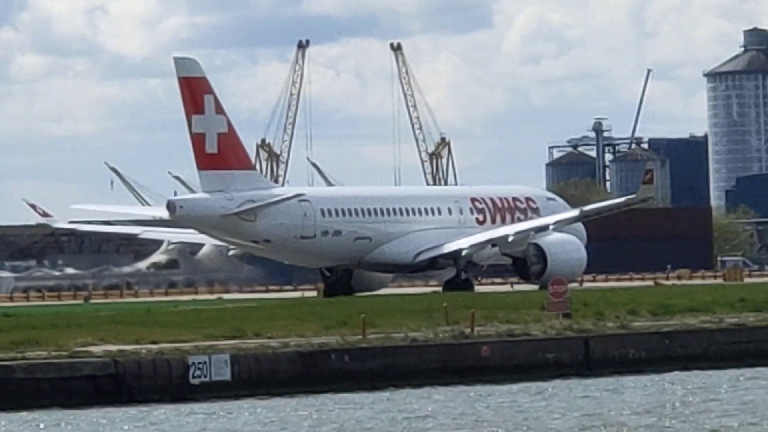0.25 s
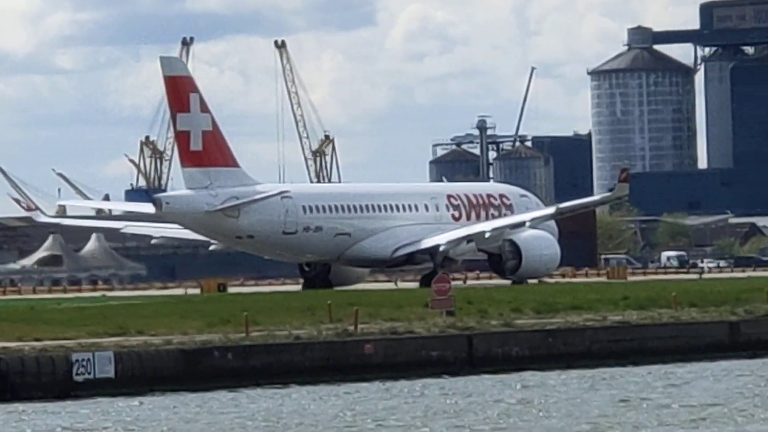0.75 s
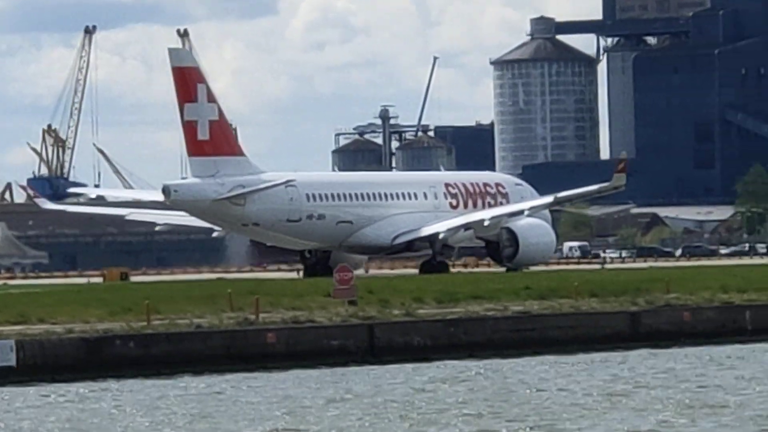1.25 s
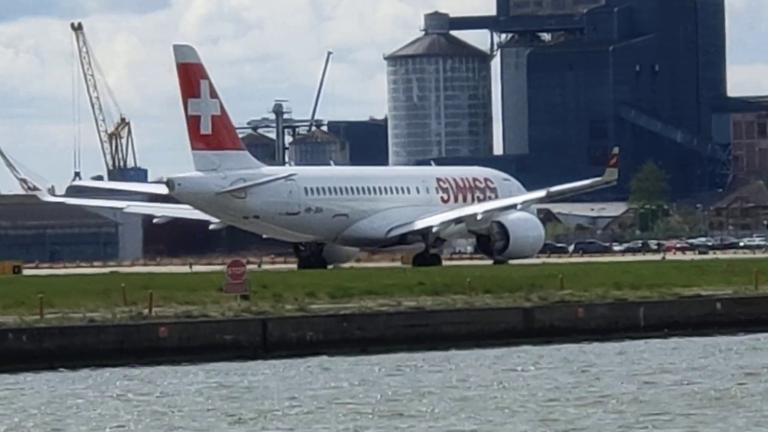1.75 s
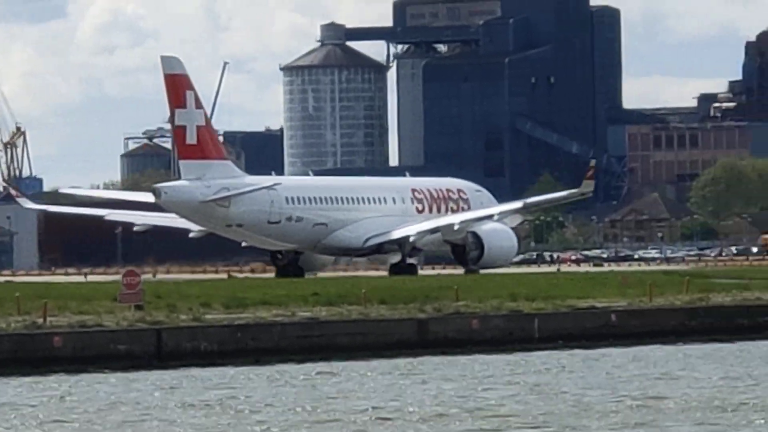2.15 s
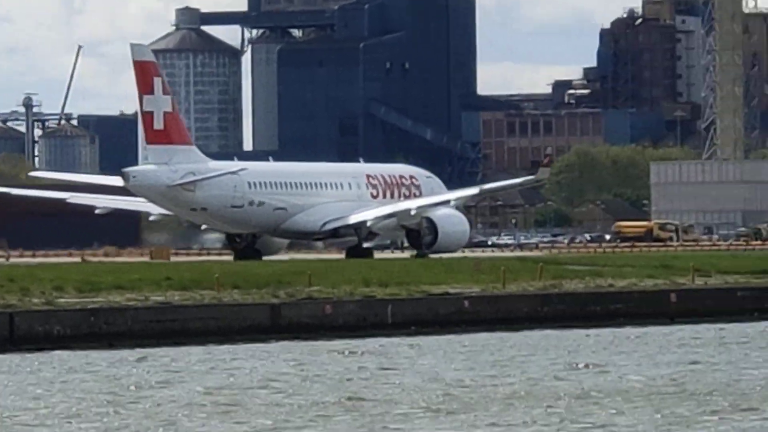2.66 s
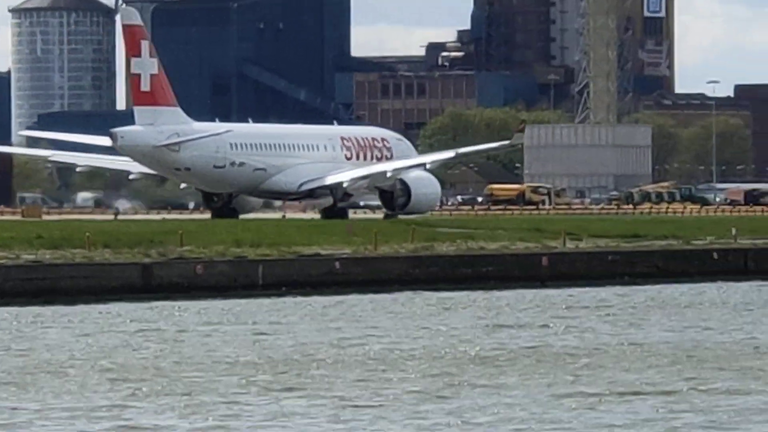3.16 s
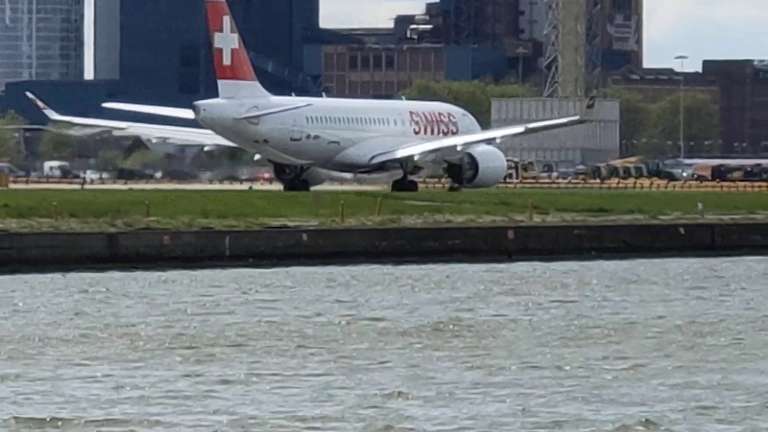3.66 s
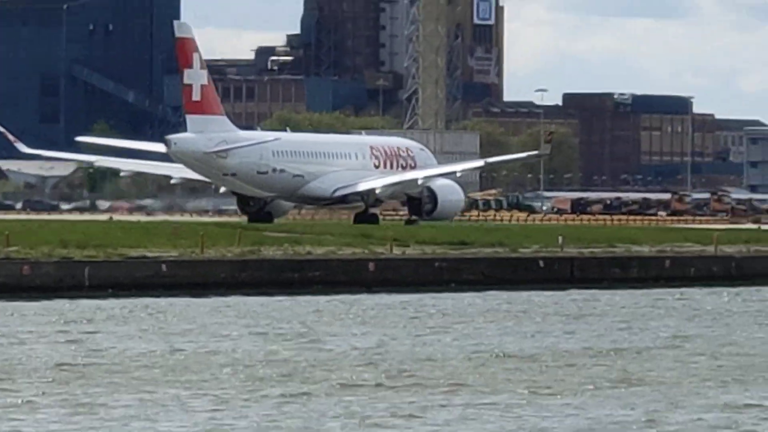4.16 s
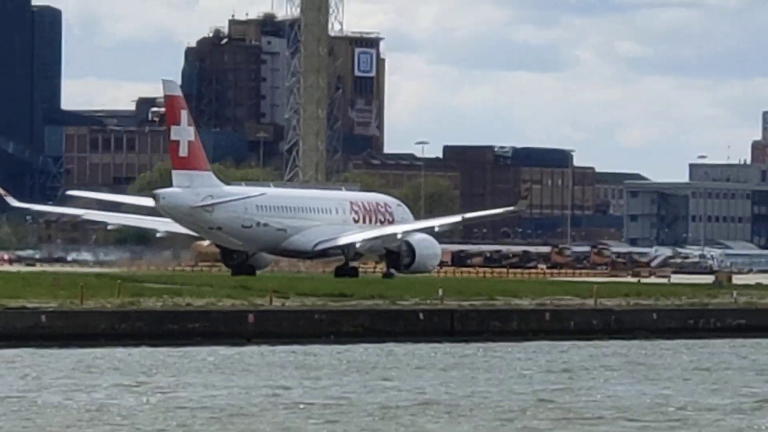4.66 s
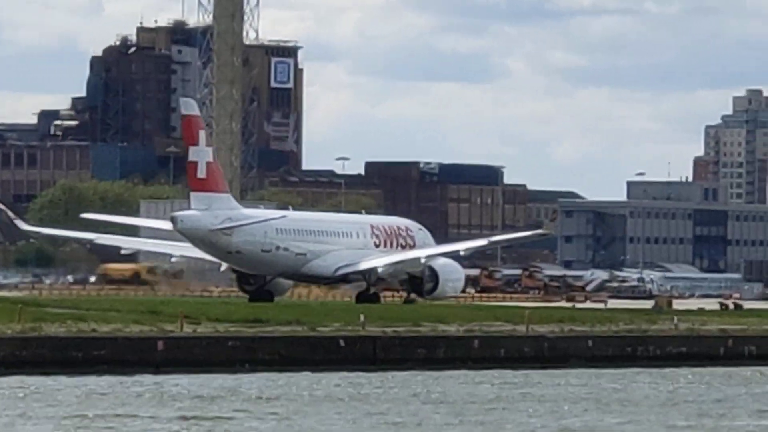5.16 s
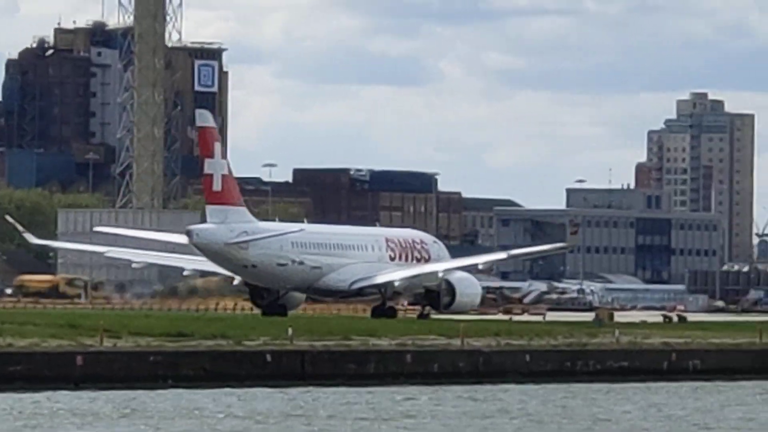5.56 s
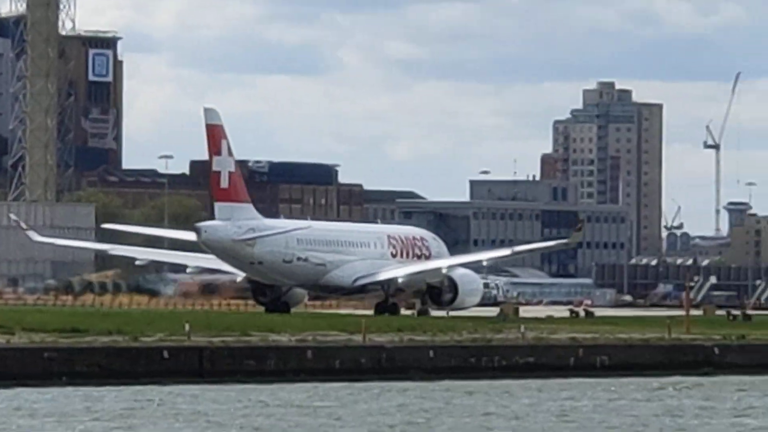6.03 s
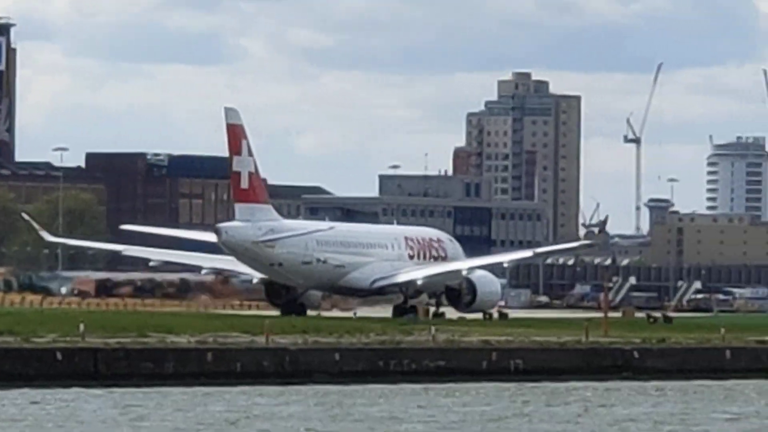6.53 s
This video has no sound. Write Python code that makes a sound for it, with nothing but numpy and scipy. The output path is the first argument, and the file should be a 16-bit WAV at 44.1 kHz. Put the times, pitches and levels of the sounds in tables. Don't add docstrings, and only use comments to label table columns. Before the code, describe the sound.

An airliner taxis away across water, low jet rumble and breathy roar with a wavering whine, while wind thumps the microphone in bursts.

```python
import sys
import numpy as np
from scipy import signal
from scipy.fft import rfft, irfft
from scipy.io import wavfile
from scipy.ndimage import uniform_filter1d

SR = 44100
rng = np.random.default_rng(int(sys.argv[2]) if len(sys.argv) > 2 else 0)


def gain_from_db(level_db):
    decades = np.asarray(level_db, float) / 20
    return 10 ** decades


def unload_wav(signal):
    wavfile.write(
        sys.argv[1],
        SR,
        np.round(np.clip(np.atleast_2d(signal).T, -1, 1) * 32767).astype(np.int16),
    )


N = 299439
TIME = np.arange(N) / SR
FRAME, HOP = 1024, 256

# time in seconds, heading from 0 (side-on) to 1 (tail-on).
HEADING = [
    (0, 0.085),
    (1, 0.055),
    (2.8, 0.11),
    (3.6, 0.66),
    (6.79, 0.78),
]
# time in seconds, level in dB.
RUMBLE_LEVEL = [(0.0, -28.5), (0.4, -27), (0.65, -26), (1.1, -26.5), (1.4, -30), (1.9, -26.5), (2.5, -28),
                (2.85, -27), (3.25, -29.5), (3.55, -33.5), (3.8, -31.5), (4.3, -33.5), (5.0, -32.5),
                (5.25, -23), (5.6, -30.5), (6.0, -31), (6.4, -34), (6.8, -32)]
# frequency in Hz, density in dB per Hz.
RUMBLE_COLOUR = [(12, -53), (20, -23), (43, -24), (65, 0), (135, -4.5), (203, -8.5), (289, -18.5),
                 (336, -17), (380, -24.5), (520, -28), (680, -51), (1140, -120)]
# time in seconds, half-length in seconds, peak in dB.
DEEP_THROBS = [(0.1, 0.12, -35), (0.64, .2, -38), (1.13, 0.38, -31), (1.5, 0.11, -29), (1.66, .05, -29.5),
               (1.95, .3, -33), (2.25, 0.23, -32.5), (2.63, 0.063, -30.5), (2.78, 0.11, -28),
               (2.94, 0.076, -26), (3.2, .2, -30), (3.57, 0.19, -33.5), (4.1, 0.8, -36), (4.9, 0.16, -29.5),
               (5.15, .06, -32), (5.31, .1, -33.5), (5.62, 0.18, -31.5), (5.9, .08, -30), (6.2, 0.33, -33),
               (6.67, 0.03, -24)]
# time and half-length in seconds, centre in Hz,
# lift in dB.
PLUME_POCKETS = [(.12, 0.055, 209, 4), (.85, .15, 267, -2.5), (1.15, .08, 290, 4), (1.6, .25, 60, -4),
                 (2.0, .1, 190, -1), (2.1, 0.11, 269, 3), (2.75, 0.18, 90, 2), (3.55, .06, 150, -4),
                 (3.68, .06, 139.5, 3.5), (5.5, .15, 50, -3), (5.75, .1, 120.3, 2.5), (6.05, .08, 258, 2.5),
                 (6.2, .08, 79.4, -2.5), (6.45, 0.13, 169.6, -4.5)]
ROAR_CENTRES_HZ = [680, 1100, 2000, 3800]
# frequency in Hz, density in dB per Hz.
ROAR_SIDE_ON = [(240, -42), (400, -30), (504, -24), (615, -5), (749, -6), (800, -3), (855, -6),
                (1110, -5.5), (1480, -12), (1950, -7.5), (2380, -12), (3350, -21.5), (3740, -22),
                (4510, -27.5), (5400, -40.5), (5900, -50), (7230, -83), (12200, -120)]
ROAR_TAIL_ON = [(240, -45.5), (400, -2.5), (569, -5.5), (635, -6), (774, -4.5), (846, -5.5), (1110, -7),
                (1430, -13.5), (1550, -12), (1600, -5.5), (1690, 0), (1830, -5), (2040, -15.5), (3240, -24),
                (5560, -38.5), (7230, -62), (12200, -120)]
# frequency in Hz, width in Hz, lift in dB.
ECHO_RIPPLE = [
    (2510, 120, 7.5),
    (3900, 80, 2.5),
    (2940, 67, -2.5),
    (3220, 140, 6.5),
]
# level side-on in dB, level tail-on in dB, share of the air's swelling it follows.
ROAR_PARTS = [
    (-42.5, -43, 0.86),
    (-42, -43, 1),
    (-41, -46.5, 0.89),
    (-43, -53, 0.46),
]
# time in seconds, level in dB.
AIR_CARRY = [(0.0, 1.5), (0.4, -0.5), (0.7, 1.5), (1.05, 5.5), (1.35, 6), (1.65, 2), (2.0, 5), (2.3, 8.5),
             (2.55, 3.5), (2.95, 2.5), (3.3, 3), (3.6, 0), (4.45, -2), (4.9, 3), (5.1, 1.5), (5.8, 2.5),
             (6.4, -0.5), (6.79, -1)]
# time and half-length in seconds, centre in
# Hz, lift in dB.
ROAR_POCKETS = [(1.1, 0.044, 2000, 2.5), (1.1, 0.13, 5200, 3), (2.9, 0.47, 5400, -3), (5.3, 0.79, 4800, 1.5),
                (6.3, 0.28, 5630, -1.5), (1.15, 0.27, 1090, 3), (1.3, .12, 700, 0.5),
                (1.71, 0.26, 1114, 7.5), (2.1, 0.11, 1100, 3), (2.268, 0.35, 706, 6),
                (2.406, 0.23, 2060, 3.5), (2.198, 0.087, 1980, 0.5), (2.42, 0.091, 3800, 2),
                (3.05, 0.13, 646, -3.5), (2.9, .12, 477, 2), (4.35, .15, 400, 5), (2.7, 0.18, 1106, 8),
                (2.75, 0.12, 536, 3.5), (3.365, 0.4, 693, 6), (4.44, 0.25, 2000, 3.5),
                (4.934, 0.063, 700, 5), (4.85, 0.22, 3720, 3), (5.18, 0.049, 700, 9), (5.26, .1, 2000, -1),
                (5.655, 0.44, 1960, 4), (5.96, 0.32, 1100, 3)]
# frequency in Hz, likeness from 0 to 1.
LIKENESS_SIDE_ON = [(40, .8), (80, 0.99), (300, 0.97), (470, 0.71), (700, 0.95), (1200, 0.87), (1500, 0.13),
                    (1900, 0.91), (2580, 0.51), (3630, .75), (5110, 0.5)]
LIKENESS_TAIL_ON = [(40, .8), (80, 1), (200, 0.95), (450, .75), (700, 0.7), (1100, 0.54), (1500, 0.2),
                    (1900, 0.4), (2500, 0.077), (3500, 0.37), (5100, 0.26)]
# frequency in Hz, likeness from 0 to 1.
BASS_LIKENESS = [(40, .84), (90, .9), (150, 1)]
# frequency in Hz, difference in dB.
BALANCE_SIDE_ON = [(60, -1), (84, -0.5), (120, -2), (170, 0.5), (240, -1), (330, -2), (470, 2.5), (660, 1),
                   (920, 1), (1300, -4), (1830, 1), (2580, -9), (3630, -1), (5110, -5)]
BALANCE_TAIL_ON = [(60, -1.5), (84, -0.5), (120, 0.5), (170, -0.5), (240, 0.5), (330, -1), (470, -1),
                   (660, 1.5), (920, -1), (1300, -0.5), (1830, -3.5), (2580, 2), (3630, -2.5), (5110, -14)]
# frequency in Hz, lead in radians.
LEFT_LEAD = [(0, 0), (1210, -0.2), (1460, 1.6), (1720, -0.3), (2070, -0.2), (2330, 1.8), (2580, 5.2),
             (2930, 6.7), (3270, 6.8), (3530, 6.4), (3880, 6.6), (4130, 6.4), (4910, 7.4), (5250, 6.8)]
# time in seconds, blade tone in Hz.
FAN_PITCH = [(0, 799), (1.5, 799), (2.3, 796), (2.7, 798), (3.0, 803), (3.35, 814), (3.7, 819), (4.1, 824),
             (4.5, 826), (5.1, 825), (5.45, 819), (5.8, 816.5), (6.2, 814), (6.79, 813)]
# order, trim in dB, left-right in dB, left lead in radians, dock echo in dB.
FAN_ORDERS = [
    (1, -4, -1, 0.19, -50.5),
    (2, -4, 11, 0.45, -49),
    (4, -12.5, -7.5, 0.41, -62.5),
]
# width in Hz, amount of beating left in.
FAN_BLUR = [
    (8, .18),
    (8, .12),
    (90, 2.),
]
# time and half-length in seconds, peak in dB.
BLADE_FLARES = [(0.04, 0.025, -43), (0.54, .07, -37), (0.69, 0.055, -39), (1.05, .2, -50.5),
                (1.32, 0.11, -34.5), (1.74, 0.083, -31.5), (1.91, .05, -33), (2.1, 0.081, -30),
                (2.23, 0.044, -21), (2.44, 0.048, -30), (2.82, .05, -36), (2.96, .07, -35),
                (3.39, 0.074, -30.5), (3.88, 0.06, -40.5), (4.3, 0.054, -47), (4.83, 0.17, -41),
                (5.1, 0.17, -41), (5.34, .05, -32.5), (5.84, 0.031, -32.5), (5.92, 0.019, -28.5),
                (5.99, 0.054, -32), (6.15, 0.072, -45), (6.75, 0.047, -41)]
# time and half-length in seconds, peak in dB.
OCTAVE_FLARES = [(0.0, .05, -48), (0.68, 0.077, -50), (0.96, 0.097, -44), (1.3, 0.18, -56),
                 (1.74, .07, -43.5), (1.98, .06, -40), (2.25, 0.063, -39), (2.38, .05, -45),
                 (2.52, 0.051, -46), (2.96, 0.041, -46), (3.15, 0.2, -44.5), (3.38, 0.069, -37.5),
                 (3.66, 0.075, -46.5), (3.95, 0.14, -42.5), (4.25, 0.041, -44), (4.6, 0.27, -47.5),
                 (4.86, 0.14, -40.5), (5.43, 0.12, -39.5), (5.66, 0.055, -37.5), (5.84, 0.077, -41),
                 (5.98, 0.082, -39.5), (6.22, .08, -44), (6.6, 0.31, -54)]
# time in seconds, half-length in seconds, peak in dB.
LEFT_GUSTS = [(0.09, 0.041, -23), (0.42, 0.06, -37), (0.6, 0.046, -33), (0.98, 0.056, -37),
              (1.33, 0.032, -23), (1.47, 0.089, -26.5), (1.68, 0.066, -28), (2.03, 0.054, -31),
              (2.3, 0.045, -48), (2.62, 0.078, -34.5), (2.93, 0.045, -39), (4.52, 0.053, -35.5),
              (4.68, 0.075, -29.5), (4.91, 0.045, -23.5), (5.06, 0.1, -23.5), (5.135, 0.032, -20.5),
              (5.2, 0.064, -18), (5.27, 0.036, -21), (5.33, 0.044, -17), (5.385, 0.038, -13.5),
              (5.44, 0.021, -21), (5.56, .04, -34), (5.8, 0.062, -29), (5.95, 0.094, -25),
              (6.17, 0.085, -30), (6.33, 0.15, -32.5), (6.62, 0.043, -35)]
RIGHT_GUSTS = [(0.1, 0.04, -40), (0.403, 0.07, -39), (0.61, 0.044, -32), (0.8, 0.039, -27),
               (0.99, 0.041, -29), (1.127, 0.045, -36), (1.47, 0.057, -26), (1.63, 0.064, -28.5),
               (2.31, 0.048, -29), (2.592, 0.05, -32), (2.72, .06, -41), (2.94, 0.033, -36),
               (3.152, 0.067, -35), (4.533, 0.076, -34), (4.781, 0.077, -24), (4.924, 0.063, -16.5),
               (5.038, 0.045, -29.5), (5.172, 0.073, -28), (5.27, 0.072, -31), (5.498, 0.1, -23.5),
               (5.825, 0.05, -34.5), (5.908, 0.041, -26), (6.1, 0.11, -39), (6.296, 0.064, -34),
               (6.55, 0.13, -42)]
# time in seconds, peak in dB.
THUMPS = [
    [(0.041, -25), (1.306, -25), (4.924, -24), (5.133, -10), (5.147, -12), (5.182, -11), (5.192, -10),
     (5.216, -11), (5.225, -22), (5.264, -12), (5.302, -20), (5.318, -26), (5.343, -14), (5.352, -12),
     (5.366, -15), (5.379, -18), (5.387, -14), (5.395, -16), (5.439, -26), (5.924, -9), (6.164, -23)],
    [(0.8, -23), (0.975, -19), (1.447, -22), (1.628, -18), (2.299, -37), (2.578, -32), (4.733, -14.5),
     (4.777, -15), (4.793, -15), (4.864, -14), (4.876, -19), (4.905, -21), (4.919, -21), (4.929, -13),
     (4.942, -7), (4.952, -14), (5.011, -17), (5.067, -10), (5.114, -7), (5.169, -10), (5.184, -19),
     (5.485, -8), (5.518, -12.5), (5.885, -30)],
]
THUMP_MS = [0.42, 0.34]
PORT_SHARPNESS = [.2, .55]
PORT_SIGN = [-1, 1]
PORT_REBOUND = [.35, .15]
# time in seconds, peak in dB.
MOTOR_TICKS = [(0.0318, -58), (0.4668, -67), (0.5172, -66), (0.598, -65), (0.6779, -64), (0.8375, -64),
               (1.0395, -61), (1.1573, -64), (1.2376, -68), (1.3159, -62.5), (1.3877, -65.5), (1.708, -68),
               (1.7973, -71.5), (1.8776, -67), (1.957, -68), (2.0273, -68), (2.1171, -66), (2.3565, -67),
               (2.588, -63.5), (2.7716, -66), (2.828, -66), (2.9178, -64), (2.9981, -62), (3.0774, -63),
               (3.2375, -66), (3.3179, -63), (3.3937, -66), (3.4531, -67), (3.5578, -67), (3.6376, -67),
               (3.7179, -70), (3.7878, -61), (3.8781, -66), (3.9449, -66), (4.0352, -60), (4.0946, -66),
               (4.2777, -59), (4.357, -66), (4.596, -64), (4.6773, -63), (4.7476, -65), (4.8379, -66),
               (4.9177, -67), (4.9975, -69), (5.0699, -65), (5.238, -63), (5.3173, -68), (5.384, -66),
               (5.4779, -64.5), (5.5568, -69), (5.6371, -67), (5.7079, -61), (5.9574, -64), (6.1968, -66),
               (6.2771, -65), (6.348, -65), (6.4368, -66), (6.5176, -62), (6.5974, -64), (6.6677, -65)]
# frequency in Hz, density in dB per Hz.
HISS_COLOUR = [(5000, -19), (6100, 4), (6500, 2.5), (9000, 0), (11000, -2.5), (13000, -0.5), (14150, -3.5),
               (14400, -64.5)]
# frequency in Hz, threshold in dB.
GATE_OVER = [(4700, -12), (5400, -5.5), (5800, -5), (6050, 1.5), (6350, .3), (6650, .8), (7000, 1),
             (9000, 1), (10000, 1.2), (12600, .8), (13450, 1.3), (13700, 4.5), (14300, 5)]
# frequency in Hz, rise in dB per dB.
GATE_MASKING = [(7000, 0), (12500, .02), (13400, .2), (13700, .6), (14300, .6)]
# frequency in Hz, rise in dB.
GATE_SIDE_ON = [(4700, 6), (5100, 7), (5400, 7.5), (5700, 4), (6050, 1.5), (6350, 0), (6650, 2), (7000, 0)]


def rumble():
    def shape_db(hz, t):
        deep_share = 1 / (1 + (hz / 125) ** 6)
        level_db = follow(RUMBLE_LEVEL, t)[0]
        deep_db = surges(DEEP_THROBS, -36, t) + 2.5
        swell = np.outer(deep_share, deep_db) + np.outer(1 - deep_share, level_db)
        return read(RUMBLE_COLOUR, hz)[:, None] + swell + focus(PLUME_POCKETS, hz, t)
    return gain_from_db(-27.0) * evened(port_noise(shape_db, patchy_db=-1.1))


def roar():
    def shape_db(hz, t):
        heading, carry_db = follow(HEADING, t)[0], follow(AIR_CARRY, t)[0]
        ripple = sum(db * np.exp(-.5 * ((hz - f) / width) ** 2) for f, width, db in ECHO_RIPPLE)
        colour = blend(ROAR_SIDE_ON, ROAR_TAIL_ON, hz, t) + np.outer(ripple, heading)
        shape = colour + focus(ROAR_POCKETS, hz, t)
        for one_part, (side_db, tail_db, carry_share) in zip(np.eye(4), ROAR_PARTS):
            share = read(list(zip(ROAR_CENTRES_HZ, one_part)), hz)
            power = (share[:, None] * gain_from_db(2 * colour)).sum(0)
            level_db = side_db + (tail_db - side_db) * heading + carry_share * carry_db
            shape = shape + np.outer(share, level_db - 10 * np.log10(power))
        return shape
    return gain_from_db(3.0) * port_noise(shape_db, patchy_db=0.87)


def whine():
    hz = follow(FAN_PITCH, TIME)[0]
    blade_db = surges(BLADE_FLARES, -46, TIME)
    octave_db = surges(OCTAVE_FLARES, -54, TIME)
    slow_db = uniform_filter1d(octave_db, size=SR // 2)
    levels = [blade_db, octave_db, slow_db]
    out = np.zeros((2, N))
    for (order, trim_db, pan_db, lead, echo_db), (width, beating), db in zip(FAN_ORDERS, FAN_BLUR, levels):
        tone = np.exp(2j * np.pi * np.cumsum(round(order) * hz) / SR)
        drift = rng.standard_normal((2, N)) + 1j * rng.standard_normal((2, N))
        drift = signal.sosfilt(signal.butter(2, width / 2, fs=SR, output="sos"), drift)
        drift /= np.sqrt(np.mean(abs(drift) ** 2))
        direct = tone * drift[0] / (beating + abs(drift[0]))
        echo = tone * drift[1] * np.roll(drift[1], SR)
        pair = evened(np.array([direct, direct * np.exp(-1j * lead)]).real)
        out += pair * gain_from_db(np.array([[pan_db], [-pan_db]]) / 2) * gain_from_db(db + trim_db)
        out += gain_from_db(echo_db) * evened(echo.real) * np.array([[1], [-1]])
    return out


def wind():
    eddies_per_s, spread_db, lumpy_db = 520, 2.2, 1.2
    limit = .5
    cut = signal.butter(2, 110, "highpass", fs=SR, output="sos")
    out = np.zeros((2, N))
    for k, gusts in enumerate((LEFT_GUSTS, RIGHT_GUSTS)):
        level_db = surges(gusts, -62, TIME)
        lumps = uniform_filter1d(rng.standard_normal(N), size=700)
        lumps = evened(uniform_filter1d(lumps, size=700))
        strike = rng.random(N) < eddies_per_s / SR
        size = gain_from_db(spread_db * np.minimum(rng.exponential(1, N), 3)) * strike
        size = size * np.where(rng.random(N) < PORT_REBOUND[k], -1, 1)
        kind = rng.integers(0, 3, N)
        sharp = PORT_SHARPNESS[k] * gain_from_db(.4 * (level_db + 22))
        widths = [(.3, sharp), (.6, gain_from_db(.3 * (level_db + 20))), (1.15, .7)]  # (ms, share)
        eddies = np.zeros(N)
        for j, (ms, share) in enumerate(widths):
            eddies += share * signal.oaconvolve(size * (kind == j), dip(ms), "same")
        eddies = signal.sosfiltfilt(cut, eddies)
        power = uniform_filter1d(eddies ** 2, size=SR // 10)
        gusting = eddies / np.sqrt(power + 1e-9) * gain_from_db(level_db + lumpy_db * lumps - 0.5)
        s, db = np.transpose(THUMPS[k])
        thumps = np.bincount(np.round((s + .002) * SR).astype(int), gain_from_db(db + 4), N)
        thumps = signal.sosfiltfilt(cut, signal.oaconvolve(thumps, dip(THUMP_MS[k]), "same"))
        out[k] = PORT_SIGN[k] * (gusting + thumps)
    return limit * np.tanh(out / limit)


def lens_motor():
    s, db = np.transpose(MOTOR_TICKS)
    kicks = np.bincount(np.round(s * SR).astype(int), gain_from_db(db), N)
    fade = np.exp(-1 / (.004 * SR))
    burst = signal.lfilter([1], [1, -fade], kicks) * rng.standard_normal((2, N))
    burst = .7 * burst + .7 * burst[0]
    ticks = np.array([resonate(port, 8900, 2400) for port in burst])
    return gain_from_db(4.5) * ticks * gain_from_db(np.array([[1.5], [-1.5]]))


def hiss():
    hz = np.fft.rfftfreq(N, 1 / SR)
    spectrum = rfft(rng.standard_normal((2, N))) * gain_from_db(read(HISS_COLOUR, hz)) * (hz > 4000)
    return gain_from_db(-68.5) * evened(irfft(spectrum, N))


def port_noise(shape_db, patchy_db):
    hz, t = np.fft.rfftfreq(FRAME, 1 / SR), np.arange(N // HOP + 5) * HOP / SR
    a, b, c, d, patches = rng.standard_normal((len(t), len(hz), 5)).T
    patches = uniform_filter1d(patches, size=14, axis=0)
    patches = evened(uniform_filter1d(patches, size=20, axis=1))
    shared, separate = a + 1j * b, c + 1j * d
    same = np.clip(blend(LIKENESS_SIDE_ON, LIKENESS_TAIL_ON, hz, t), 0, read(BASS_LIKENESS, hz)[:, None])
    balance = gain_from_db(blend(BALANCE_SIDE_ON, BALANCE_TAIL_ON, hz, t) / 2)
    lead = np.interp(hz, *np.transpose(LEFT_LEAD))[:, None]
    left = shared * balance
    right = (same * shared * np.exp(-1j * lead) + np.sqrt(1 - same ** 2) * separate) / balance
    z = np.array([left, right]) * gain_from_db(shape_db(hz, t) + patchy_db * patches)
    return signal.istft(z, nperseg=FRAME, noverlap=FRAME - HOP)[1][:, :N]


def blend(side_on, tail_on, hz, t):
    heading = np.clip(follow(HEADING, t)[0], 0, 1)
    return np.outer(read(side_on, hz), 1 - heading) + np.outer(read(tail_on, hz), heading)


def focus(rows, hz, t):
    lift = 0
    for s, half, f, db in rows:
        in_pitch = np.exp(-(np.log2((hz + 1) / f) / 0.4) ** 2)
        in_time = np.exp(-((t - s) / half) ** 2)
        lift = lift + db * np.outer(in_pitch, in_time)
    return lift


def surges(rows, calm_db, t):
    grid = np.arange(0, t[-1] + 1, .004)
    s, half, db = np.transpose(rows)[:, :, None]
    bells_db = db - 8 * ((grid - s) / half) ** 2
    power = gain_from_db(2 * calm_db) + gain_from_db(2 * bells_db).sum(0)
    return np.interp(t, grid, 10 * np.log10(power))


def dip(ms):
    return -np.exp(-.5 * (np.arange(-400, 400) / SR * 1000 / ms) ** 2)


def resonate(x, hz, width):
    turn = np.exp(2j * np.pi * np.cumsum(hz * np.ones(len(x))) / SR)
    r = np.exp(-np.pi * width / SR)
    low = signal.lfilter([1 - r], [1, -r], x / turn)
    low = signal.lfilter([1 - r], [1, -r], low)
    return 2 * (turn * low).real


def evened(x):
    return x / np.sqrt(np.mean(x ** 2) + 1e-20)


def read(points, hz):
    f, value = np.transpose(points)
    return np.interp(np.log(hz + 1), np.log(f + 1), value)


def follow(rows, t):
    s, *columns = np.transpose(rows)
    return [np.interp(t, s, c) for c in columns]


def scene():
    outside = rumble() + roar() + whine() + wind()
    treble_cut = signal.firwin(601, 5870, fs=SR)[None]
    return signal.oaconvolve(outside, treble_cut, "same") + lens_motor() + hiss()


def gate(x):
    depth_db, lead_in = -60, 859
    frames = dict(fs=SR, window="cosine", nperseg=2048, noverlap=1024)
    hz, t, z = signal.stft(np.pad(x, ((0, 0), (lead_in, 0))), **frames)
    power = (abs(z) ** 2).sum(0)
    top = np.flatnonzero(hz > 4700)[:450]
    cells = power[top].reshape(-1, 3, power.shape[1]).mean(1)
    centre = hz[top][1::3]
    usual = uniform_filter1d(cells, size=61, axis=1)
    roar_power = power[(hz > 150) & (hz < 4000)].sum(0)
    roar_db = uniform_filter1d(10 * np.log10(roar_power + 1e-20), size=5)
    limit_db = read(GATE_OVER, centre)[:, None]
    limit_db = limit_db + np.outer(read(GATE_MASKING, centre), roar_db - roar_db.mean())
    limit_db = limit_db + np.outer(read(GATE_SIDE_ON, centre), 1 - follow(HEADING, t)[0])
    shut = np.repeat(cells < usual * gain_from_db(2 * limit_db), 3, axis=0)
    gain = np.ones(power.shape)
    gain[top] = gain_from_db(depth_db * shut)
    return signal.istft(z * gain, **frames)[1][:, lead_in:lead_in + N]


def low_pass(x):
    return signal.sosfilt(signal.butter(12, 14212, fs=SR, output="sos"), x)


def record(dry):
    bass_cut = signal.butter(1, 45, "highpass", fs=SR, output="sos")
    thin = signal.sosfiltfilt(bass_cut, dry)
    return low_pass(gate(thin))


dry = scene()
out = record(dry)
unload_wav(out)
```